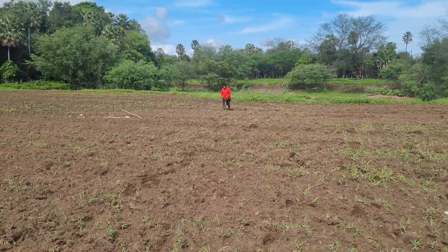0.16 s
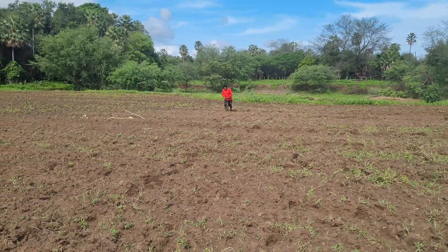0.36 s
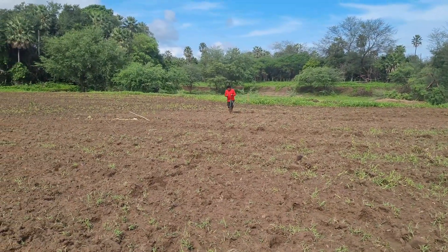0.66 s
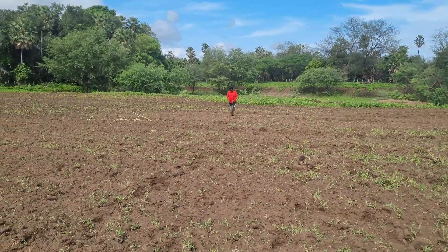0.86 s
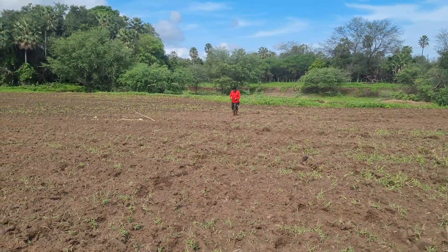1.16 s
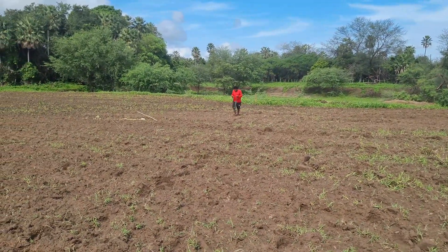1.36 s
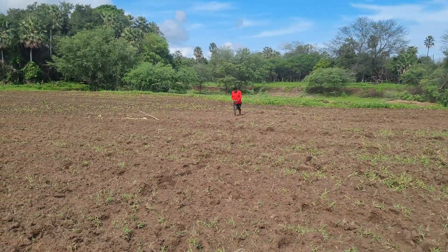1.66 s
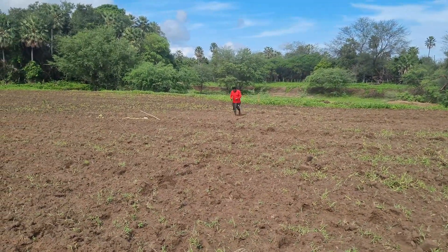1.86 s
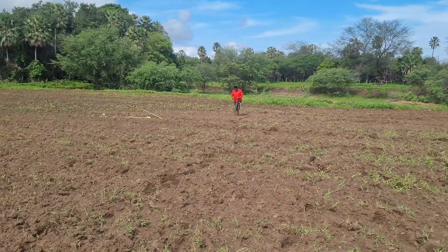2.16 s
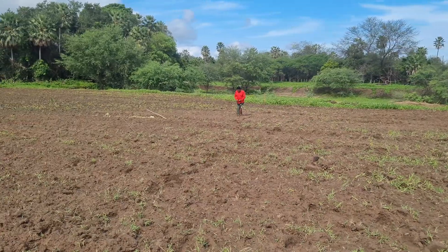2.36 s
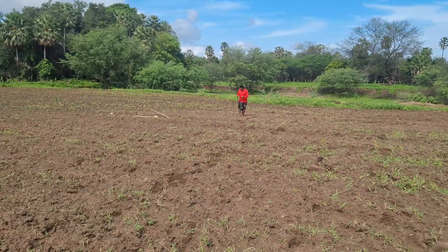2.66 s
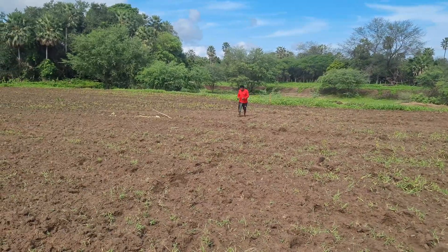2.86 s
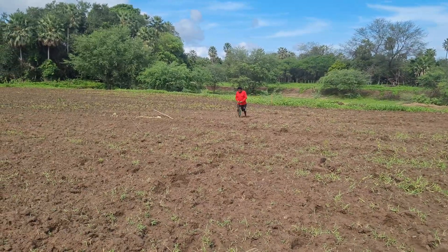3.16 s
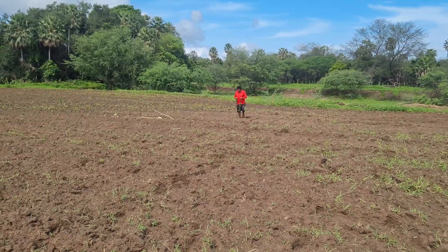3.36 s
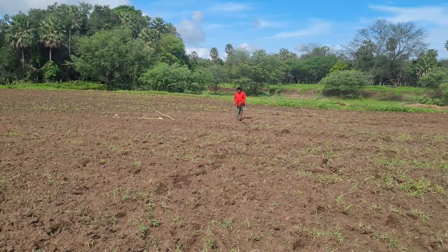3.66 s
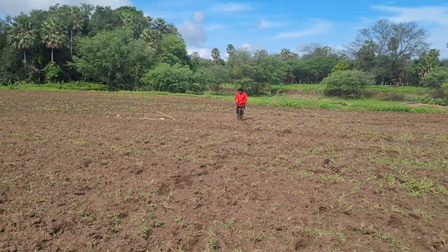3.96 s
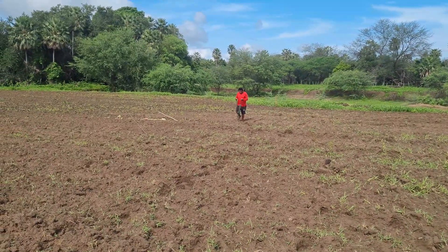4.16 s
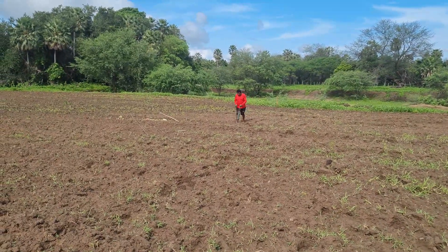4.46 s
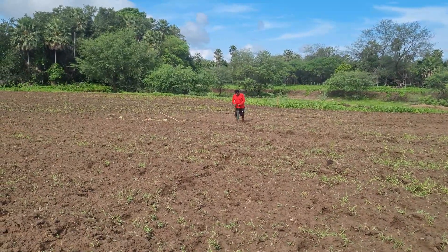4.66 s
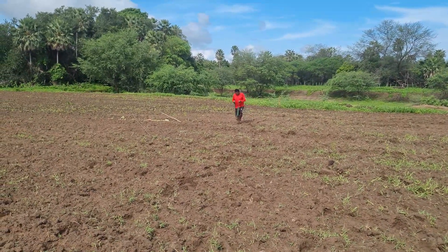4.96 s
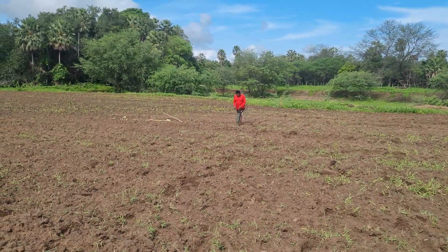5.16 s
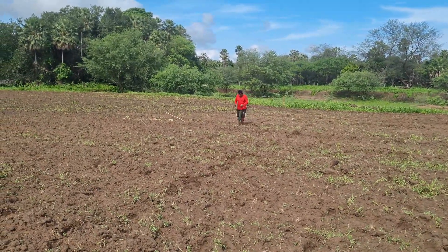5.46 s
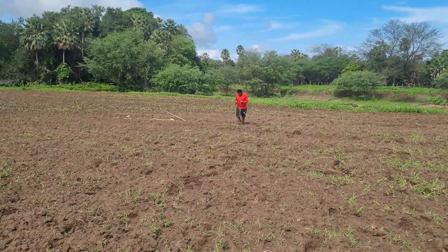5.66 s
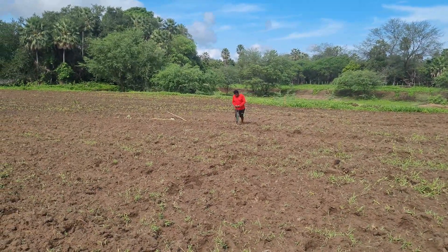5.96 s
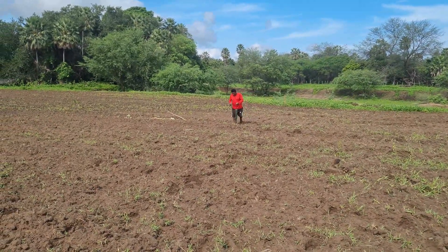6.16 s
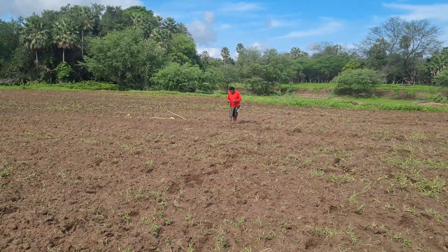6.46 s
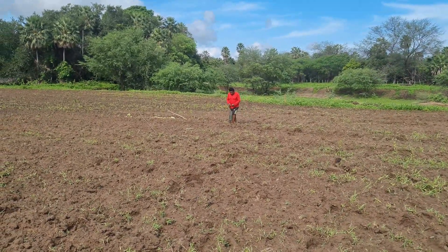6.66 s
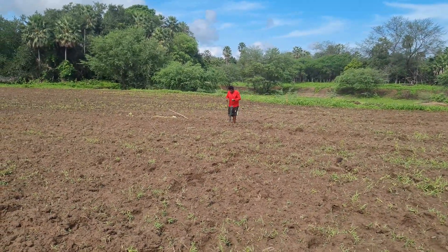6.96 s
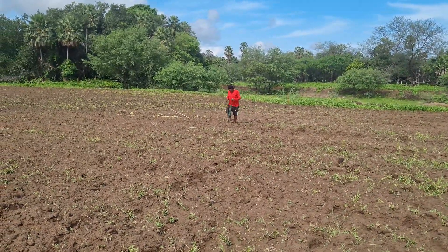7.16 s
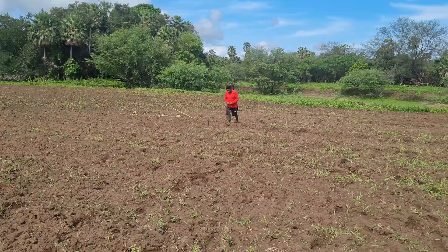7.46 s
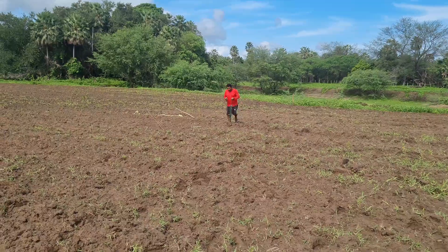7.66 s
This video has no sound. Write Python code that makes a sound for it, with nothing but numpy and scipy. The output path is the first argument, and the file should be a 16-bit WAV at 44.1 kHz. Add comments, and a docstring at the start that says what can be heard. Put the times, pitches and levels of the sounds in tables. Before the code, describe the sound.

Close by, a metal seed planter is jabbed into soil again and again, seeds crashing and the jaw clacking twice per stroke, with birds beyond.

```python
"""A hand seed planter is jabbed into soil eleven times, close to the microphone in an open field.
Each stroke: the tube slides, seeds crash against it, the jaw clacks twice; loose parts tick and metal squeaks.
Each contact is a burst of tiny impacts, rung through filters that hold the tool's resonances.
Gliding sine tones make the birds that call, whistle, warble and chatter at the tree line.
Filtered noise gives a light breeze and the outdoor rumble; a wavering sine gives a faint low drone."""
import sys
import numpy as np
from scipy import signal
from scipy.fft import rfft, irfft
from scipy.io import wavfile
from scipy.ndimage import uniform_filter1d

SR = 44100
rng = np.random.default_rng(int(sys.argv[2]) if len(sys.argv) > 2 else 0)


def transcribe(signal):
    """Save signal, clipped to [-1, 1], as a 16-bit WAV file at the path in sys.argv[1]."""
    frames = np.atleast_2d(signal).T
    limited = np.clip(frames, -1, 1)
    pcm = np.round(limited * 32767).astype(np.int16)
    wavfile.write(sys.argv[1], SR, pcm)


N = 344862

# the tube slides down and stirs the seeds: (time [s], length [s], start level [dB], end level [dB],
# treble [dB], level of the trickle that follows [dB])
TUBE_SLIDES = [(0.099, 0.24, -27.5, -35.5, -0.5, -43), (0.808, 0.22, -29.5, -35.5, -3, -44.5),
               (1.495, 0.2, -34.5, -31.5, -1, -44.5), (2.187, 0.23, -34, -35, -3.5, -48),
               (2.938, 0.19, -30, -42, -2, -44), (3.605, 0.21, -35, -33, -3, -47),
               (4.372, 0.17, -26.5, -31, -2, -43), (5.084, 0.16, -32, -31.5, -5, -43.5),
               (5.814, 0.16, -28, -39, -3, -42), (6.522, 0.17, -26.5, -32, -3.5, -43),
               (7.24, 0.088, -24, -30, 0, -40)]
# the jaw snaps open, then shut, once per stroke: (time [s], level [dB], body [dB], treble [dB])
JAW_CLACKS = [(0.349, -11.5, 3.5, 3.5), (0.537, -18, 15, -3), (1.051, -16.5, 3, -6), (1.255, -18, 12, 1.5),
              (1.753, -13.5, 12, 2), (1.957, -18.5, 4.5, 1.5), (2.462, -13, 11.5, 8),
              (2.667, -19.5, 3.5, 3), (3.175, -12, 8.5, 2), (3.367, -14, 2.5, 2.5), (3.895, -14, 12.5, 0.5),
              (4.096, -16.5, 6, -2.5), (4.614, -14, 13, 3), (4.813, -18.5, 10.5, -3),
              (5.325, -10.5, 7.5, 4), (5.535, -22, 6, -3.5), (6.044, -13.5, 8, 1), (6.24, -18, 10.5, -3),
              (6.761, -13, 9.5, -0.5), (6.958, -20.5, 6, -3.5), (7.466, -15, 3, -2), (7.64, -15.5, 11.5, 2)]


def gain_of(db):
    """Decibels to gain."""
    return 10 ** (np.asarray(db) / 20)


def evened(x):
    """Scales to an rms of 1."""
    return x / np.sqrt(np.mean(x ** 2) + 1e-20)


def read(points, hz):
    """Reads a table of (frequency [Hz], value) on a log-frequency axis."""
    f, value = np.transpose(points)
    return np.interp(np.log(hz + 1), np.log(f + 1), value)


def add(mix, s, sound):
    """Mixes a sound in at a time in seconds; whatever falls outside the scene is cut."""
    at = round(s * SR)
    sound = sound[max(-at, 0):]
    part = mix[max(at, 0):][:len(sound)]
    part += sound[:len(part)]


def wander(size, rate_hz):
    """Slow random drift with an rms of about 1: noise kept below a rate."""
    hz = np.fft.rfftfreq(size + SR, 1 / SR)
    spectrum = rfft(rng.standard_normal(size + SR)) / (1 + (hz / rate_hz) ** 4)
    return evened(irfft(spectrum))[:size]


def swells(rows, half_s, calm_db):
    """A gain that rests at a calm level and rises in bell-shaped swells."""
    t = np.arange(N) / SR
    swell_power = sum(gain_of(db) ** 2 * np.exp(-((t - s) / half_s) ** 2) for s, db in rows)
    return np.sqrt(gain_of(calm_db) ** 2 + swell_power)


def scatter(x, t60):
    """Clods and trees return a diffuse tail, different at each port; t60 is its 60 dB decay in seconds."""
    t = np.arange(SR) / SR
    tail = rng.standard_normal((2, SR)) * gain_of(-60 * t / t60) * np.clip(t / 0.0019, 0, 1)
    tail = tail / np.linalg.norm(tail, axis=1)[:, None]
    return signal.fftconvolve(x[None], tail, axes=1)[:, :N]


def note(hz, db):
    """A pure tone that follows a pitch curve and fades at both ends."""
    tone = np.sin(2 * np.pi * np.cumsum(hz) / SR)
    return gain_of(db) * np.sqrt(2) * tone * signal.windows.tukey(len(hz), .35)


def air():
    """Soft outdoor rumble and far hiss from shaped noise, with a low drone that wavers in pitch and level."""
    # colour of the rumble: (frequency [Hz], density [dB per Hz])
    rumble_colour = [(25, -11), (45, 1), (70, 2), (110, -7), (200, -16.5), (350, -18.5), (700, -13.5),
                     (1400, -20.5), (2000, -11), (4000, -43)]
    # the drone: (time [s], pitch [Hz], level before a 1.5 dB lift [dB])
    drone_curve = [(0.0, 48.7, -60.5), (1.09, 58.9, -63), (1.5, 58.5, -58), (3.2, 70, -66.5),
                   (3.7, 42, -68), (6.23, 45.1, -60.5), (7.82, 45.1, -62)]
    hz, t = np.fft.rfftfreq(N, 1 / SR), np.arange(N) / SR
    shared, *own = rng.standard_normal((3, N))  # the shared part makes the two ports alike
    rumble = evened(irfft(rfft(np.array(own) + 0.74 * shared) * gain_of(read(rumble_colour, hz)), N))
    hiss_db = read([(300, 0.0), (1400, -27.0), (3000, -15.0), (5500, 2.0),
                    (8500, -7), (12000, -5), (16000, -9)], hz)
    hiss = evened(irfft(rfft(rng.standard_normal((2, N))) * gain_of(hiss_db), N))
    s, pitch_hz, level_db = np.transpose(drone_curve)
    turns = np.cumsum(np.interp(t, s, pitch_hz) * (1 + 0.048 * wander(N, 13))) / SR
    drone_db = np.interp(t, s, level_db) + 1.5 + 1.7 * wander(N, 5.2)
    drone = gain_of(drone_db) * np.sin(2 * np.pi * turns)
    low = gain_of(-60.5) * rumble * gain_of(0.86 * wander(N, 6.4)) + drone
    return low * gain_of([[-2.5], [2]]) + gain_of(-59.5) * hiss


def breeze():
    """Leaves far away give a soft, low rush of noise that swells in gusts."""
    gusts = [(1.55, -64.5), (4.4, -66.5), (5.45, -67.5), (6.9, -67)]  # (time [s], peak level [dB])
    hz = np.fft.rfftfreq(N, 1 / SR)
    shared, *own = rng.standard_normal((3, N))
    colour_db = read([(100, -33), (250, 1.5), (420, -1.0), (650, -17), (1500, -25)], hz)
    rush = evened(irfft(rfft(np.array(own) + shared) * gain_of(colour_db), N))
    return rush * swells(gusts, half_s=0.27, calm_db=-71) * gain_of(1.4 * wander(N, 11))


def flock(per_s, lo_hz, hi_hz):
    """Many far birds murmur in the bushes and break into flurries: short gliding chirps, blurred by the trees."""
    flurries = [(0.63, -48), (2.82, -54), (4.25, -52), (4.9, -51), (5.67, -44), (6.38, -43.5), (7.08, -41),
                (7.78, -45.5)]  # (time [s], peak level before the split into direct and blurred sound [dB])
    out = np.zeros(N)
    for when, pitch, glide, span, loud in rng.random((round(per_s * N / SR), 5)):
        u = np.linspace(-1, 1, round((0.0089 + 0.0215 * span) * SR))
        middle_hz = lo_hz + (hi_hz - lo_hz) * pitch
        hz = middle_hz * (1 + 0.197 * (glide - .5) * u)
        add(out, when * N / SR, note(hz, -12 * loud))
    out = evened(out) * swells(flurries, half_s=0.061, calm_db=-58.5)
    blurred = scatter(out, t60=0.089)
    return gain_of(-3.5) * (out + blurred) * gain_of([[-3], [1.5]])


def birds():
    """Drooping low calls, curved whistles and hoarse warbles, all gliding tones."""
    # a low call holds its pitch, then droops: (time [s], length [s], start pitch [Hz], level [dB])
    low_calls = [(-0.04, 0.15, 1016, -54), (1.257, 0.16, 937, -55.5), (1.79, 0.21, 1026, -52.5),
                 (2.617, 0.1, 896, -56.5), (3.282, 0.16, 927, -52.5), (3.805, 0.23, 1033, -54),
                 (5.34, 0.16, 937, -52.5), (5.884, 0.22, 1030, -58), (6.188, 0.07, 851, -51.5),
                 (6.893, 0.076, 829, -55.5), (7.144, 0.16, 923, -51), (7.677, 0.21, 1027, -52.5)]
    # other birds whistle curves: (time [s], length [s], start [Hz], middle [Hz], end [Hz], level [dB])
    whistles = [(0.11, 0.095, 2810, 2920, 2780, -41.5), (0.354, 0.44, 1885, 2380, 2153, -51),
                (0.703, 0.072, 3450, 3080, 2670, -52), (6.262, 0.19, 5640, 5340, 5290, -45),
                (7.035, 0.0526, 2500, 2405, 2210, -41), (7.166, 0.16, 2120, 2106, 2050, -54.5),
                (7.47, 0.13, 2040, 1910, 1780, -51)]
    # a bird warbles hoarsely: (time [s], length [s], level [dB])
    warbles = [(1.138, 0.19, -56), (1.83, 0.2, -55), (2.562, 0.13, -59), (3.302, 0.112, -53.5),
               (4.009, 0.13, -53.5), (5.448, 0.12, -51), (7.497, 0.11, -51)]
    droop_end_hz, droop_curve = 749, 2.5  # every call heads for the same end pitch, falling ever faster
    warble_hz = 837
    out = np.zeros(N)
    for s, length, start_hz, db in low_calls:
        u = np.linspace(0, 1, round(length * SR))
        droop = start_hz + (droop_end_hz - start_hz) * u ** droop_curve
        add(out, s, note(droop * (1 + 0.012 * wander(len(u), 76)), db + 3.0 * wander(len(u), 30)))
    for s, length, start_hz, middle_hz, end_hz, db in whistles:
        u = np.linspace(0, 1, round(length * SR))
        arch = np.polyval(np.polyfit([0, .5, 1], [start_hz, middle_hz, end_hz], 2), u)
        add(out, s, note(arch * (1 + 0.0086 * wander(len(u), 67)), db + 4.0 * wander(len(u), 21)))
    for s, length, db in warbles:
        size = round(length * SR)
        hoarse_hz = warble_hz * (1 + 0.095 * wander(size, 62))
        add(out, s, note(hoarse_hz, db + 3 * wander(size, 105)))
    return out * gain_of([[-2.5], [1]]) + gain_of(-1) * scatter(out, t60=0.22)


def squeaks():
    """The tool's metal squeaks: short falling tones near 6.3 kHz with a diffuse tail."""
    # (time [s], middle pitch [Hz], level before a 7.5 dB cut [dB])
    metal_squeaks = [(2.522, 6500, -38), (2.555, 6300, -39.5), (2.832, 6230, -39), (4.018, 6200, -37),
                     (4.233, 6100, -39), (5.258, 6800, -40), (5.398, 5840, -38), (5.498, 6320, -36),
                     (5.977, 6700, -38), (6.912, 5880, -30.5)]
    out = np.zeros(N)
    for s, hz, db in metal_squeaks:
        add(out, s, note(hz * np.linspace(1.08, .92, round(0.0107 * SR)), db - 7.5))
    return out * gain_of([[-2.5], [1]]) + gain_of(-1) * scatter(out, t60=0.22)


def causal(db):
    """The minimum-phase impulse response of a gain curve: sharp start, ringing after."""
    cepstrum = irfft(np.log(gain_of(db)))
    half = len(cepstrum) // 2
    cepstrum[1:half] *= 2  # fold the part before time zero onto the part after it
    cepstrum[half + 1:] = 0
    return irfft(np.exp(rfft(cepstrum)))[:half]


def ring(body_db, treble_db, uneven_db):
    """The tool's answer to one impact; each contact point favours other high modes."""
    # colour of the tool: (frequency [Hz], level [dB])
    tool_colour = [(100, -39.5), (400, -39.5), (600, -28.5), (1400, -29.5), (1950, -25.5), (2250, -12),
                   (4000, -10.5), (5500, -9), (8000, -18.5), (10200, -14), (11200, -8), (12500, -5.5),
                   (14000, -16.5), (16000, -24.5)]
    # resonances of the tube and hopper: (frequency [Hz], width [Hz], lift [dB])
    tube_modes = [(548, 17, 9.5), (734, 23.5, 10.5), (1104, 130, 9), (1224, 35, 7), (1603, 130, 10),
                  (2713, 210, 6.5), (3172, 100, 6.5), (4265, 400, -3), (6900, 110, 1.5), (11580, 250, 4)]
    hz = np.fft.rfftfreq(4096, 1 / SR)
    db = read(tool_colour, hz)
    db = db + sum(lift / (1 + (2 * (hz - f) / width) ** 2) for f, width, lift in tube_modes)
    db = db + body_db / (1 + (hz / 1700) ** 6)
    db = db + treble_db / (1 + (9000 / (hz + 1)) ** 6)
    modes = uniform_filter1d(uniform_filter1d(rng.standard_normal(len(hz)), size=22), size=12)
    answer = causal(db + uneven_db * evened(modes) * hz / (hz + 1500))
    return answer / np.linalg.norm(answer)


def grains(size, per_s, spread_db):
    """A hail of tiny impacts of unequal strength, at random moments and of either sign."""
    strength = gain_of(spread_db * np.minimum(rng.exponential(1, size), 4))
    struck = rng.random(size) < per_s / SR
    return evened(strength * rng.choice([-1, 1], size) * struck)


def knock(chatter_s, buzz_db, buzz_s):
    """Metal meets metal, chatters for a few milliseconds and buzzes out."""
    t = np.arange(SR // 10) / SR
    force = np.exp(-t / chatter_s) + gain_of(buzz_db) * np.exp(-t / buzz_s)
    return force * np.clip(t / 0.00035, 0, 1) * grains(len(t), 14000, 0.53)


def stirred_db(t):
    """How lively the seeds are: each stroke stirs them up, and they settle after the jaw has shut."""
    rise_s, rise_range_db = 0.28, 6.5  # the ramp gains this much from the start of the slide, then holds
    hold_s, settle_db_per_s, rest_db = 0.047, 67, -64
    pause_lead_s, pause_width_s, pause_db = 0.024, 0.013, 7  # the trickle dips just before each clack
    level_db = np.full(len(t), float(rest_db))
    for (start, *_, db), (shut, *_) in zip(TUBE_SLIDES, JAW_CLACKS[1::2]):
        rise_db = rise_range_db * np.minimum((t - start) / rise_s - 1, 0)
        settle_db = settle_db_per_s * np.maximum(t - shut - hold_s, 0)
        level_db = np.maximum(level_db, db + rise_db - settle_db)
    pauses = sum(np.exp(-((t - s + pause_lead_s) / pause_width_s) ** 2) for s, *_ in JAW_CLACKS)
    return level_db - pause_db * pauses


def shifting():
    """A thin, uneven trickle of seeds on eight spots of the wall, each with its own ring."""
    spots = [gain_of(4.3 * wander(N, 52)) * grains(N, 600, 3.2) for _ in range(8)]
    trickle = evened(sum(signal.oaconvolve(spot, ring(1.0, -8.0, 3.4))[:N] for spot in spots))
    return gain_of(stirred_db(np.arange(N) / SR)) * trickle


def strays():
    """Stray seeds tick at random, louder while the load is stirred: rows of (time, level, treble)."""
    per_s, over_trickle_db, spread_db = 9, 13.5, 3.5
    when, loud, bright = rng.random((round(per_s * N / SR), 3)).T
    s = (np.arange(len(when)) + when) / len(when) * N / SR  # one seed in each equal slot of time
    level_db = stirred_db(s) + over_trickle_db + spread_db * (2 * loud - 1)
    treble_db = -3.5 + 8 * (2 * bright - 1)
    return list(zip(s, level_db, treble_db))


def ticks():
    """Light contacts and some squeaks as soft-onset knocks; single metal parts ring as short decaying sines."""
    # loose parts tick, and some metal squeaks are played as ticks:
    # (time [s], level before a 4.5 dB lift [dB], treble [dB])
    tick_rows = [(0.227, -12.5, 8), (0.293, -15, 13), (0.554, -24, 6), (0.821, -26, 14), (1.815, -31, -4),
                 (2.617, -27, 1), (3.132, -20.5, 5.5), (3.226, -29.5, -9), (3.831, -23.5, 7.5),
                 (5.101, -23, -3), (5.429, -25, -2), (5.5, -23.5, -3), (5.654, -26.5, 9), (5.682, -27, -2),
                 (6.376, -23, 1), (6.408, -24.5, 9), (6.54, -16.5, 7), (7.044, -19.5, 2), (7.079, -23, 7),
                 (7.419, -25, 15), (7.59, -27.5, 2), (7.768, -22.5, -0.5)]
    # one metal part rings on its own: (time [s], frequency [Hz], level before a 7 dB lift [dB])
    pings = [(1.81, 4370, -29), (2.374, 1150, -33), (2.714, 10850, -28), (5.848, 2420, -23),
             (7.417, 7850, -25), (7.444, 5520, -24)]
    out = np.zeros(N)
    t = np.arange(SR // 10) / SR
    graze = np.clip(t / 0.0028, 0, 1)
    for s, db, treble_db in [*tick_rows, *strays()]:
        blow = gain_of(db + 4.5) * graze * knock(chatter_s=0.003, buzz_db=-15, buzz_s=0.018)
        add(out, s - .001, signal.fftconvolve(blow, ring(0, treble_db, 4.5)))
    for s, hz, db in pings:
        envelope = np.clip(t / 0.0034, 0, 1) * np.exp(-t / 0.0047)
        add(out, s, gain_of(db + 7.0) * envelope * np.sin(2 * np.pi * hz * t))
    return out


def slides():
    """The tube rasps down its guide: dense grains whose level moves from a start to an end value."""
    out = np.zeros(N)
    for s, length, start_db, end_db, treble_db, _ in TUBE_SLIDES:
        t = np.arange(0, length, 1 / SR)
        level_db = np.interp(t, [.035, .09], [start_db, end_db]) + 2.1 * wander(len(t), 50)
        push = gain_of(level_db) * np.clip(t / 0.011, 0, 1) * np.clip((length - t) / 0.019, 0, 1)
        rasp = push * grains(len(t), 9000, 2.2)
        add(out, s, signal.fftconvolve(rasp, ring(0, treble_db, 1.4)))
    return out


def rattles():
    """Seeds landing in clumps, and short squeaks of the spring or jaw, as swelling and fading clouds of grains."""
    # seed throws, and short bright squeaks of the spring or jaw, played as grains:
    # (time [s], length [s], level before a 0.7 dB cut [dB], body [dB], treble [dB])
    grain_clouds = [(0.209, 0.082, -15.5, 1, 2), (0.936, 0.042, -13.5, -1, 1.5),
                    (1.206, 0.027, -29, -16, 9), (1.624, 0.051, -13.5, 3.5, 2),
                    (1.918, 0.024, -27.5, -17, 11.5), (2.32, 0.058, -11.5, -3, 4),
                    (2.706, 0.037, -32.5, -2, 10), (3.003, 0.084, -15.5, -0.5, 0),
                    (3.329, 0.032, -26, -5, 11.5), (3.404, 0.036, -31, 4, 5), (3.741, 0.049, -12, -3, 0),
                    (4.052, 0.026, -29.5, -16, 8), (4.47, 0.042, -12, 7, 0), (4.764, 0.049, -30.5, 7.5, 4),
                    (5.18, 0.049, -13, -1, 2), (5.872, 0.064, -11, 2, 3), (6.215, 0.035, -23.5, -2.5, -0.5),
                    (6.616, 0.064, -14.5, 3.5, -1), (6.901, 0.037, -30, 6, 13), (7.301, 0.08, -16, 4, 1.5)]
    out = np.zeros(N)
    for s, length, db, body_db, treble_db in grain_clouds:
        u = np.linspace(-1, 1, round(length * SR))
        clumps_db = 2.2 * wander(len(u), 220)
        swell = np.exp(-3.3 * abs(u) ** 2.3)
        cloud = gain_of(db - 0.7 + clumps_db) * swell * grains(len(u), 7000, 2.96)
        add(out, s, signal.fftconvolve(cloud, ring(body_db, treble_db, 3.2)))
    return out


def clacks():
    """The jaw hits its stops: a hard, chattering knock rings the whole tool."""
    out = np.zeros(N)
    for s, db, body_db, treble_db in JAW_CLACKS:
        blow = gain_of(db + 2.5) * knock(chatter_s=0.0029, buzz_db=-17.5, buzz_s=0.019)
        add(out, s + 0.0013, signal.fftconvolve(blow, ring(body_db, treble_db, 3.57)))
    return out


def ports(x):
    """The microphone's body shades and delays the tool's sound differently at each of its two ports."""
    # (frequency [Hz], left minus right level [dB])
    balance = [(300, -1.5), (1100, -6.5), (1850, -3.5), (2150, -9), (2700, -35), (3800, -6), (5200, -14.5),
               (7000, -5), (8500, 15.5), (9400, 17), (10100, 5.5), (10800, -34), (12500, -41), (15000, -1)]
    # (frequency [Hz], phase by which left leads [rad])
    lead = [(700, 1), (1350, 0.88), (2000, 0.97), (2600, 0), (3200, 1.2), (4800, 2), (5600, 3.5), (7300, 6),
            (8600, 4.5), (9300, 6), (10200, 8.5), (11300, 16), (12400, 6), (14200, 17)]
    hz = np.fft.rfftfreq(2 * N, 1 / SR)
    ratio = gain_of(read(balance, hz))
    right = rfft(x, 2 * N) * np.sqrt(2 / (1 + ratio ** 2))  # keeps the summed power of both ports
    left = right * ratio * np.exp(1j * read(lead, hz))
    return irfft([left, right])[:, :N]


def scene():
    """The planter close by, the field around it."""
    field = birds() + flock(per_s=150, lo_hz=2710, hi_hz=4530) + breeze() + air()
    planter = slides() + rattles() + clacks() + ticks() + shifting()
    direct = gain_of(-0.04) * ports(planter) + squeaks()
    near = gain_of(-10) * scatter(planter, t60=0.027)  # clods
    far = gain_of(-29.5) * scatter(planter, t60=0.17)  # trees
    return direct + (near + far) * gain_of([[-2], [1]]) + field


def record(dry):
    """Full-scale limit, then a low-pass at the upper band edge."""
    edge_hz = 16000
    edge = signal.firwin(401, edge_hz, window=("kaiser", 8), fs=SR)
    return signal.oaconvolve(np.clip(dry, -1, 1), edge[None], "same")


dry = scene()
out = record(dry)
transcribe(out)
```